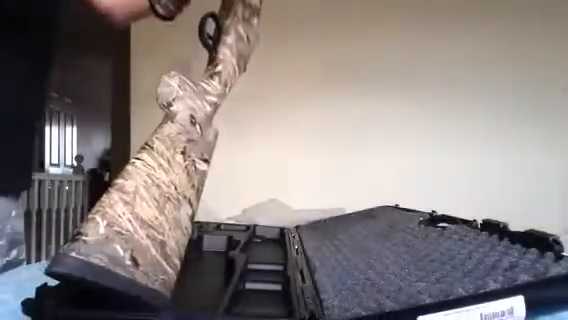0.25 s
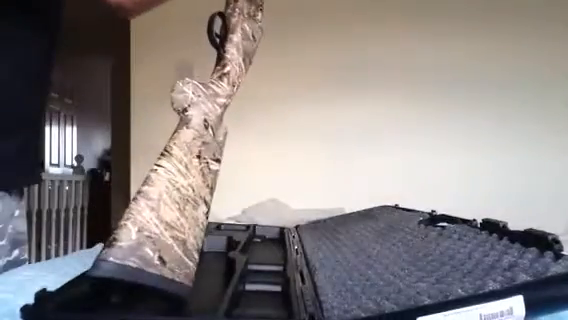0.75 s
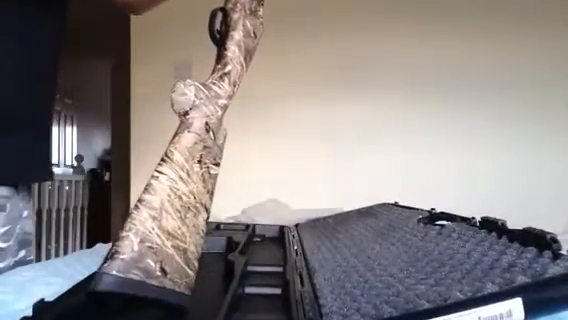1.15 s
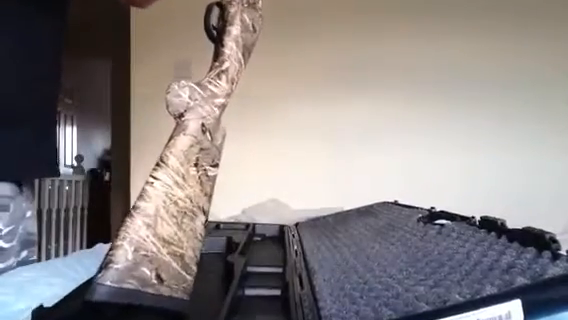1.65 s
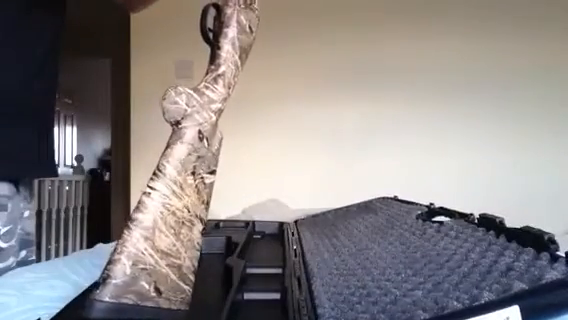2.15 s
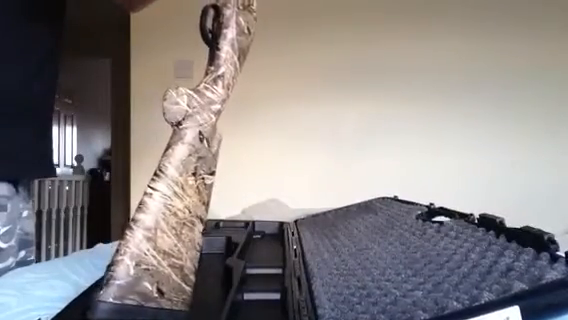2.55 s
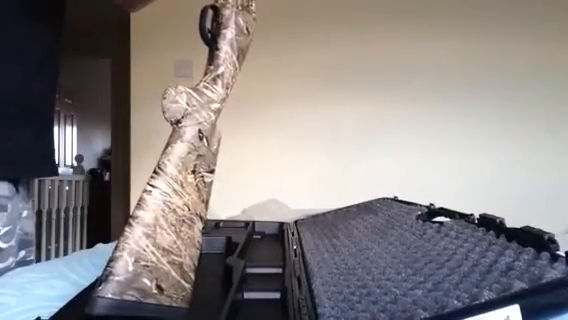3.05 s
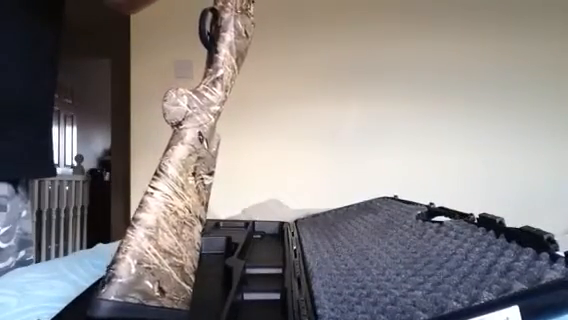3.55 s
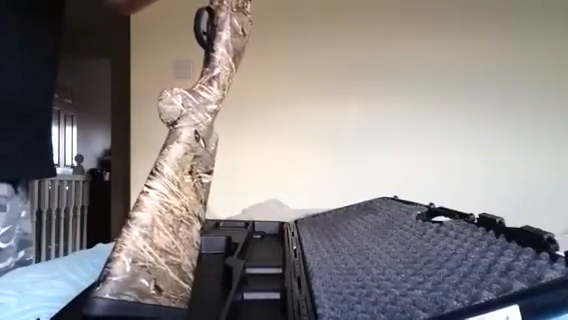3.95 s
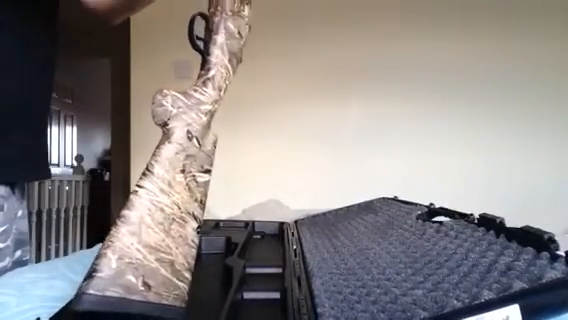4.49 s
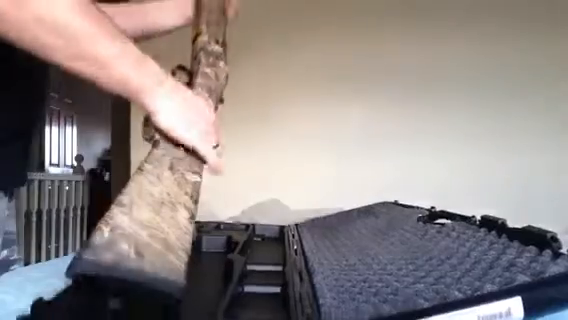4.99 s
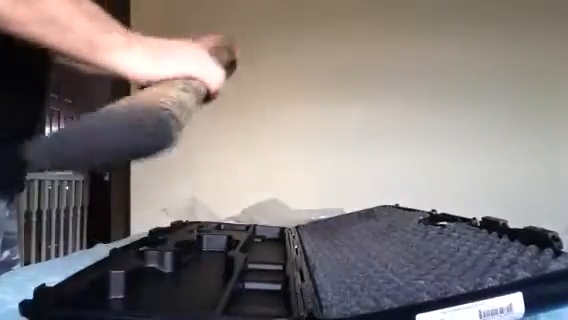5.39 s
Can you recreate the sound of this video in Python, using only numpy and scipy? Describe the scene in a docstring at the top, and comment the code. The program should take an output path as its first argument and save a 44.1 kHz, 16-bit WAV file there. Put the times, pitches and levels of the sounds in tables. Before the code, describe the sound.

Close, dry handling sounds in a small room with a short reverberant tail of about a third of a second, over quiet low rumble, hiss and a barely present hum. At 0 s a brief brush, then faint rubbing of hands and rubber pad. Small thin metallic clicks at 0.4 and 0.85 s. From 1.3 to 1.9 s the barrel knocks its way in: a dull bump, a tight cluster around 1.5 to 1.65 s, then weaker knocks with a slight steel scrape. A faint tick and a tiny high pin ping at 2.25 s lead into a heavy, ringing multi-part clack at 2.38 to 2.43 s, with a sharp scrape. Dull taps at 2.73 and 3.46 s, with faint slides. At 3.97 s a hard, bright snap cracks out. Very soft taps follow at 4.2 to 4.4 s, a brush at 4.5 s, a crisp click at 5.06 s, then light rubbing to the end.

```python
"""In a small room, a shotgun is put together over its open plastic case.
The barrel knocks and slides into the receiver and seats with a heavy clack; catches snap, hands rub and tap the stock.
Each contact is a tiny crack plus a short clatter, duller and longer the softer it is, ringing in the struck part.
Rubbing is made of many tiny random slips that swell and fade. A small pin pings, and the room answers
the contacts and the rubbing, over rumble, hiss and a faint hum."""
import sys
import numpy as np
from scipy import signal
from scipy.fft import rfft, irfft
from scipy.io import wavfile
from scipy.ndimage import uniform_filter1d

SR = 44100
rng = np.random.default_rng(int(sys.argv[2]) if len(sys.argv) > 2 else 0)


def wrap_up_sound(samples):
    """Save the sound to the file named by the first command line argument, as 16-bit audio."""
    columns = np.atleast_2d(samples).T
    # keep every value between -1 and 1, then stretch to whole-number steps
    tamed = np.clip(columns, -1, 1)
    steps = np.round(tamed * 32767).astype(np.int16)
    wavfile.write(sys.argv[1], SR, steps)


N = 248266

# Levels in the tables are relative: the mix sets the balance between the layers.
# hands and sleeves brushing the stock: fastest moment t/s, rise/s, level/dB
BRUSH_STROKES = [(0, 0.0073, -46), (.11, .027, -58.5), (.295, 0.034, -59), (.49, 0.057, -67.5),
                 (.625, 0.05, -65), (2.305, 0.041, -59), (4.526, 0.011, -56.5), (5.0, 0.063, -62.5),
                 (5.285, 0.041, -65), (5.41, 0.056, -63.5)]
# tone of the brushing: f/Hz, level/dB
BRUSH_TONE = [(300, 0), (600, 2.5), (1200, -1.5), (2200, 1.5), (4000, 0), (7000, -1.5), (11000, -1),
              (15000, -6)]
# still air of the room and microphone hiss: f/Hz, level/dB
AIR_TONE = [(35, -67.5), (60, -40.5), (87, -20.5), (167, -10.5), (242, -4), (335, -13), (394, -13),
            (486, -14.5), (521, -17), (688, -16.5), (1260, -25), (3930, -26.5), (7030, -28), (12000, -28.5),
            (15500, -31)]
# rubber butt pad shifting in the case: fastest moment t/s, level/dB
PAD_MOVES = [(.12, -65), (.33, -69), (.58, -64.5), (.75, -72), (5.6, -66)]
# tone of the rubbing pad: f/Hz, level/dB
PAD_TONE = [(300, -28.5), (450, -4.5), (590, 2.5), (720, -18), (900, -12.5), (3000, -35)]
# spring catches and small steel parts snapping:
# t/s, strength/dB, softness/(dB per octave), struck spot f/Hz, level sent to the room/dB, bass limit f/Hz
SNAP_HITS = [(0.4041, -17, 4, 2450, -1, 487), (0.854, -12.5, 2.6, 12400, -2.5, 348),
             (2.2446, -25, 3, 1550, -1.5, 700), (3.97, 8.5, -0.15, 4850, 4, 660),
             (4.698, -30.5, 1, 3750, 0, 397), (5.0555, -1, 1, 13000, -5.5, 310)]
# tone of a snap: f/Hz, level/dB
SNAP_TONE = [(510, -2), (1060, -0.5), (1940, -1.1), (3350, 1.5), (6300, -2), (8000, 1.5), (13500, -0.56),
             (15500, -2.5)]
# barrel knocking its way in:
# t/s, strength/dB, softness/(dB per octave), struck spot f/Hz, level sent to the room/dB
KNOCK_HITS = [(1.3204, -8.5, 12, 524, -6.5), (1.4968, -4.5, 5, 740, 2.5), (1.5332, -10, 12, 1750, -0.5),
              (1.634, -6.5, 7, 3650, 1), (1.6515, -1, 2.25, 3500, -3), (1.779, -11.5, 7, 1160, -2.5),
              (1.922, -20, 6, 880, 7)]
# tone of a knock: f/Hz, level/dB
KNOCK_TONE = [(510, -5), (1060, -3.5), (1940, 1.5), (3350, 3), (6700, 1), (11500, -2), (15000, -19)]
# steel sliding on steel: fastest moment t/s, rise/s, level/dB
SLIDE_STROKES = [(1.49, 0.048, -62), (1.9, 0.055, -55.5), (1.958, 0.01, -49.5), (2.35, 0.053, -52),
                 (2.376, 0.0063, -34), (2.65, 0.035, -63), (2.85, .02, -63.5), (3.04, 0.028, -60.5),
                 (3.456, 0.022, -57), (3.968, 0.0086, -43.5)]
# tone of the sliding: f/Hz, level/dB
SLIDE_TONE = [(350, -13), (700, -7), (1200, -1), (1900, -7), (3600, -1.5), (6000, -8), (10000, -10.5),
              (15000, -13.5)]
# dull taps on stock and fore-end:
# t/s, strength/dB, softness/(dB per octave), struck spot f/Hz, level sent to the room/dB
TAP_HITS = [(2.155, -26.5, 6, 1100, -3.5), (2.731, -7, 5.9, 1345, -6), (3.4602, -4, 9.2, 1741, -3),
            (3.8337, -26.5, 4.6, 1295, -8.5), (4.2254, -20, 9.1, 715, -1.5),
            (4.3855, -24.5, 8.7, 3300, -5.5), (5.551, -30.5, 5.1, 4616, 1)]
# tone of a tap: f/Hz, level/dB
TAP_TONE = [(510, -5.5), (1060, 0), (1940, 1.5), (3350, 4), (6700, 0.5), (12200, -6)]
# ways the small pin vibrates: f/Hz, level/dB, time to fall by 60 dB/s
PIN_RINGS = [(5300, -5.5, .15), (6000, -3, 0.18), (6330, 0, .13)]
# barrel seating and rebounding:
# t/s, strength/dB, softness/(dB per octave), struck spot f/Hz, level sent to the room/dB
CLACK_HITS = [(2.3783, 13, 3.6, 2618, -3), (2.3815, 18.65, 3.73, 1047, -2), (2.4071, 8.5, 3.6, 4500, -3),
              (2.4102, 11, 1.8, 1005, -2.5), (2.43, -1.5, 2.6, 2900, -7.5)]
# tone of a clack: f/Hz, level/dB
CLACK_TONE = [(510, -8), (1060, 2.5), (1940, 1.5), (3350, 2), (6700, 0), (12200, -3)]
# resonances of the catches: f/Hz, width/Hz, lift/dB
CATCH_RINGS = [(440, 55, 2.4), (940, 200, 1.8), (1100, 130, 5.5), (1750, 73, 1), (2450, 370, 5.1),
               (4230, 60, 1.5), (5100, 33, 2), (6300, 37, 2.87), (6960, 110, 8.2), (8640, 92, 3),
               (10000, 96, 2.6), (13000, 260, 3.4)]
# resonances of the barrel, and hollows where the lift is negative: f/Hz, width/Hz, lift/dB
BARREL_RINGS = [(374, 8.5, 14), (495, 87, 1.5), (810, 78, -8), (1104.4, 160, 10), (1552, 7.9, 4),
                (1989, 17, 7.5), (2612, 400, -2), (3070, 30, 7.5), (3720, 15, 2.5), (4100, 27, 6),
                (4170, 40, 8.5), (5140, 1800, -6), (6540, 200, 1), (7600, 120, 3.5), (12300, 2700, -8)]
# resonances and hollows of the stock: f/Hz, width/Hz, lift/dB
STOCK_RINGS = [(493, 39, 4), (700, 35, 4), (985, 52, 2), (1200, 130, 4), (1520, 66, 3.5), (1730, 60, 1.5),
               (1935, 320, -10), (2330, 120, 4.5), (2900, 310, -2.5), (3393, 85, 4), (4660, 320, 4.5)]
# resonances and hollows of the receiver: f/Hz, width/Hz, lift/dB
RECEIVER_RINGS = [(317, 19, 7), (457, 70, 4), (650, 42, -4), (797, 190, -8), (885.6, 12, 2),
                  (980, 6.7, 5.5), (1063, 14, 1.5), (1130, 42, 6.5), (1198, 56, 4.5), (1360, 28, 3),
                  (1750, 350, -8), (1920, 20, 3.5), (2183, 40, 3), (2590, 16, 4), (2860, 210, 8),
                  (3222, 13, 6.5), (3660, 14, 6), (3710, 40, 11.5), (3866, 12, 7), (4680, 40, 6),
                  (7060, 80, 3.5), (12700, 500, 4), (14540, 2000, -9)]
# first reflections of the room: delay t/s, level/dB
EARLY_ECHOES = [(.0031, -18), (.0095, -13.5), (0.0178, -11)]
# how long the room rings: f/Hz, time to fall by 60 dB/s
ROOM_DECAY = [(200, 0.02), (530, 0.29), (1200, 0.32), (3600, 0.2419), (9000, 0.23), (15000, 0.18)]
# tone of the room's answer: f/Hz, level/dB
ROOM_TONE = [(400, 2.5), (1000, 2.5), (2500, -1), (7000, 1), (14000, 1.5)]

AIR_DB, HUM_HZ, HUM_DB = -62, 98.5, -82
PING_S, PING_DB = 2.2455, -53.5
CUTOFF_HZ = 15600
TAIL = SR // 2  # samples
SIZE = 2 ** 16  # samples in each spectrum
HZ = np.maximum(np.arange(SIZE // 2 + 1) * SR / SIZE, 1)
PIVOT_HZ = 1060  # softness tilts the tone around this pitch
BASE_CLATTER_S = .0008  # softness adds to this time
SPOT_Q = 4.1  # pitch of the struck spot divided by its bandwidth
# how long a stroke takes to fade, as a share of its rise
BRUSH_FADE_SHARE, PAD_FADE_SHARE, SLIDE_FADE_SHARE = .7, 1.1, .55
PAD_RISE_S = 0.04


def from_db(db):
    """Turn decibels into a gain."""
    return 10 ** (np.asarray(db) / 20)


def unit_energy(x):
    """Scale so that the squares sum to one."""
    return x / np.sqrt(np.sum(x ** 2) + 1e-20)


def add(out, s, sound):
    """Mix a sound in at a time in seconds."""
    start = max(round(s * SR), 0)
    out[start:start + len(sound)] += sound[:N - start]


def at_hz(points, hz):
    """Read a value between (f/Hz, value) points, with pitch on a log scale."""
    pitch, value = np.transpose(points)
    return np.interp(np.log(hz), np.log(pitch), value)


def coloured(x, points):
    """Give a sound the tone in (f/Hz, level/dB) points, with no sound ahead of its cause."""
    # folding the cepstrum makes the filter respond as early as it can (minimum phase)
    cepstrum = irfft(np.log(from_db(at_hz(points, HZ))))
    cepstrum[1:SIZE // 2] *= 2
    cepstrum[SIZE // 2 + 1:] = 0
    response = irfft(np.exp(rfft(cepstrum)))[:SR // 20]
    return signal.fftconvolve(x, response)[:len(x)]


def high_pass(x, hz, order):
    """Take away the bass with a Butterworth filter."""
    return signal.sosfilt(signal.butter(order, hz, "high", fs=SR, output="sos"), x)


def even_burst(envelope, width_hz):
    """Make noise under an envelope, with its energy evened out across the spectrum."""
    spectrum = rfft(rng.standard_normal(len(envelope)) * envelope, SIZE)
    power = uniform_filter1d(np.abs(spectrum) ** 2, int(width_hz * SIZE / SR) + 1)
    even = irfft(spectrum / np.sqrt(power + 1e-12))
    return unit_energy(even[:len(envelope)])


def resonate(x, resonances):
    """A part rings longer at its narrower resonances and gives little sound in its hollows."""
    for hz, width_hz, lift_db in resonances:
        peak = signal.iirpeak(hz, hz / width_hz, SR)
        ringing = signal.lfilter(*peak, x + 1e-18)
        x = x + (from_db(lift_db) - 1) * ringing
    return x


def room_response(build_s):
    """A few early reflections and a diffuse tail whose decay time depends on pitch."""
    t = np.arange(TAIL) / SR
    usual_t60 = at_hz(ROOM_DECAY, 2200)
    build_up = 1 - np.exp(-(t / build_s) ** 2)
    envelope = build_up * np.exp(-np.log(1000) * t / usual_t60)
    spectrum = rfft(even_burst(envelope, width_hz=180), SIZE)
    tail = 0
    for k, (hz, t60) in enumerate(ROOM_DECAY):
        # each band fades smoothly into its neighbours
        share = at_hz([(row[0], j == k) for j, row in enumerate(ROOM_DECAY)], HZ)
        band = irfft(spectrum * share)[:TAIL]
        tail = tail + band * np.exp(-np.log(1000) * t * (1 / t60 - 1 / usual_t60))
    for delay, db in EARLY_ECHOES:
        tail[round(delay * SR)] += from_db(db)
    return coloured(unit_energy(tail), ROOM_TONE)


def in_room(x, room):
    """The room answers a sound with reflections and a tail."""
    return signal.fftconvolve(x, room)[:N]


def friction(strokes, fade_share, colour, grains_per_s, grit_db):
    """Rubbing surfaces catch in many tiny slips that swell and fade with each stroke."""
    t = np.arange(N) / SR
    speed = np.zeros(N)
    for s, rise, db in strokes:
        width_s = np.where(t < s, rise, fade_share * rise)
        speed += from_db(db) * np.exp(-.5 * ((t - s) / width_s) ** 2)
    happens = rng.random(N) < grains_per_s / SR
    # grit makes some slips much stronger than others
    slips = happens * rng.standard_normal(N) * from_db(grit_db * rng.standard_normal(N))
    texture = high_pass(coloured(slips, colour), 360, order=3)
    return speed * np.sqrt(N) * unit_energy(texture)


def contact(strength_db, softness, spot_hz, colour, lowest_hz, spot_db, clatter_s_per_softness, crack_db):
    """A crack and short clatter favour the struck spot's pitch; softer is duller and longer."""
    t = np.arange(SR // 10) / SR
    clatter_s = max(BASE_CLATTER_S + clatter_s_per_softness * softness, 1e-4)
    force = even_burst(np.exp(-t / clatter_s), width_hz=320)
    force[0] += from_db(crack_db)  # the crack is a single sample
    tone = [(hz, db + strength_db - softness * np.log2(hz / PIVOT_HZ)) for hz, db in colour]
    hit = high_pass(coloured(unit_energy(force), tone), lowest_hz, order=5)
    return resonate(hit, [(spot_hz, spot_hz / SPOT_Q, spot_db)])


def strike(hits, part, room):
    """Hits (t/s, sound, room level/dB) make the part ring and carry into the room."""
    direct, to_room = np.zeros(N), np.zeros(N)
    for s, hit, room_db in hits:
        add(direct, s, hit)
        add(to_room, s, hit * from_db(room_db))
    return resonate(direct + in_room(to_room, room), part)


def background():
    """Low room rumble and hiss are shaped noise; a faint hum is a steady sine."""
    air = high_pass(coloured(rng.standard_normal(N), AIR_TONE), 94, order=4)
    hum = np.sqrt(2) * np.sin(2 * np.pi * HUM_HZ * np.arange(N) / SR)
    return from_db(AIR_DB) * np.sqrt(N) * unit_energy(air) + from_db(HUM_DB) * hum


def brushes():
    """Hands and sleeves brush the stock in dense, fine slips."""
    return friction(BRUSH_STROKES, BRUSH_FADE_SHARE, BRUSH_TONE, grains_per_s=17000, grit_db=2.0)


def pad_rubs():
    """The rubber butt pad shifts in the case with sparser, dull slips."""
    strokes = [(s, PAD_RISE_S, db) for s, db in PAD_MOVES]
    return friction(strokes, PAD_FADE_SHARE, PAD_TONE, grains_per_s=1600, grit_db=2)


def snaps(room):
    """Catches and small steel parts snap, each with its own bass limit."""
    hits = []
    for s, db, softness, spot_hz, room_db, lowest_hz in SNAP_HITS:
        hit = contact(db, softness, spot_hz, SNAP_TONE, lowest_hz, spot_db=4.5,
                      clatter_s_per_softness=.00006, crack_db=-10.5)
        hits.append((s, hit, room_db))
    return strike(hits, CATCH_RINGS, room)


def knocks(room):
    """The barrel bumps against the receiver on its way in and rings."""
    hits = []
    for s, db, softness, spot_hz, room_db in KNOCK_HITS:
        hit = contact(db, softness, spot_hz, KNOCK_TONE, lowest_hz=365, spot_db=8.0,
                      clatter_s_per_softness=0.00048, crack_db=-8)
        hits.append((s, hit, room_db))
    return strike(hits, BARREL_RINGS, room)


def slides():
    """Steel slides on steel in gritty slips that make the barrel ring."""
    slips = friction(SLIDE_STROKES, SLIDE_FADE_SHARE, SLIDE_TONE, grains_per_s=5200, grit_db=4.5)
    return resonate(slips, BARREL_RINGS)


def taps(room):
    """Light blows make the stock and fore-end ring dully."""
    hits = []
    for s, db, softness, spot_hz, room_db in TAP_HITS:
        hit = contact(db, softness, spot_hz, TAP_TONE, lowest_hz=410, spot_db=8,
                      clatter_s_per_softness=0.00067, crack_db=-12)
        hits.append((s, hit, room_db))
    return strike(hits, STOCK_RINGS, room)


def ping():
    """A small steel pin rings out freely as a few fading sines of close pitch."""
    out, t = np.zeros(N), np.arange(TAIL) / SR
    for hz, db, t60 in PIN_RINGS:
        fade = np.exp(-np.log(1000) * t / t60)
        add(out, PING_S, from_db(PING_DB + db) * np.sin(2 * np.pi * hz * t) * fade)
    return out


def clacks(room):
    """The barrel slams home and rebounds, and the receiver rings."""
    hits = []
    for s, db, softness, spot_hz, room_db in CLACK_HITS:
        hit = contact(db, softness, spot_hz, CLACK_TONE, lowest_hz=270, spot_db=6.5,
                      clatter_s_per_softness=.00095, crack_db=-16)
        hits.append((s, hit, room_db))
    return strike(hits, RECEIVER_RINGS, room)


def scene():
    """Mix the contacts, rubbing and ping with the room's answer and the background."""
    room = room_response(build_s=0.0022)
    hits = snaps(room) + knocks(room) + taps(room) + clacks(room)
    rubbing = from_db(-3.5) * brushes() + from_db(-3) * pad_rubs() + from_db(-3.0) * slides()
    mix = from_db(-1.0) * hits + ping() + rubbing + in_room(rubbing, room) + background()
    return mix[None]


def record(dry):
    """A steep low-pass filter cuts the highest treble."""
    return signal.sosfilt(signal.ellip(10, .2, 70, CUTOFF_HZ, fs=SR, output="sos"), dry)


dry = scene()
out = record(dry)
wrap_up_sound(out)
```